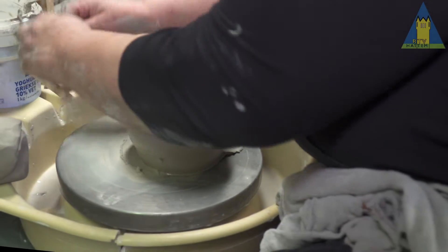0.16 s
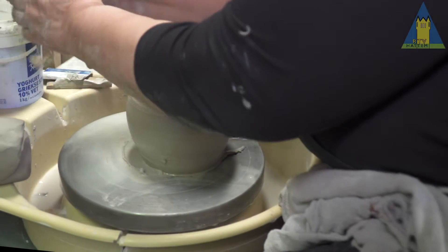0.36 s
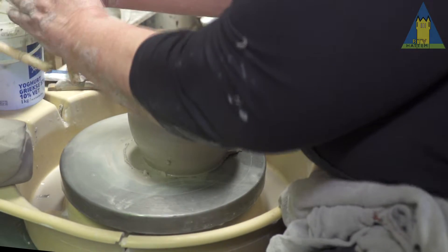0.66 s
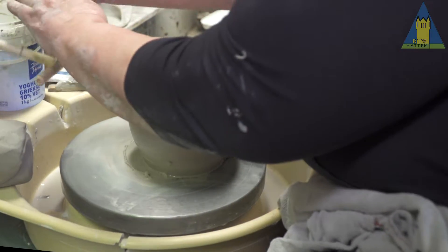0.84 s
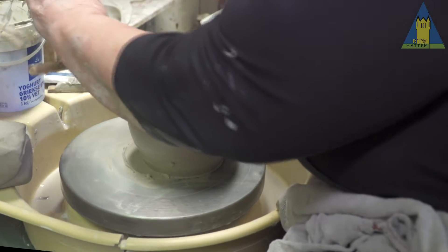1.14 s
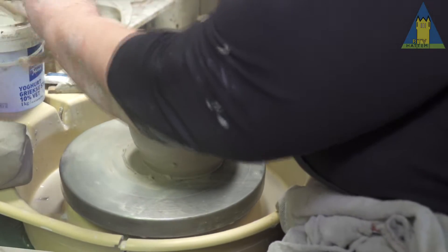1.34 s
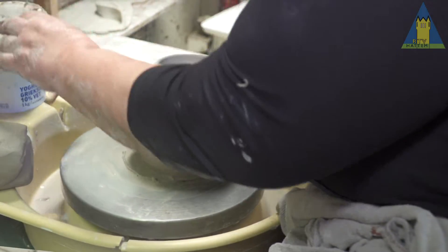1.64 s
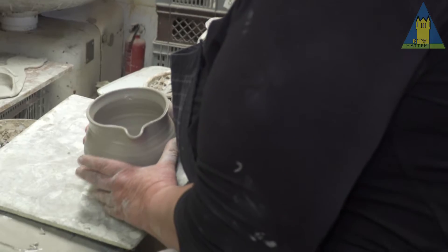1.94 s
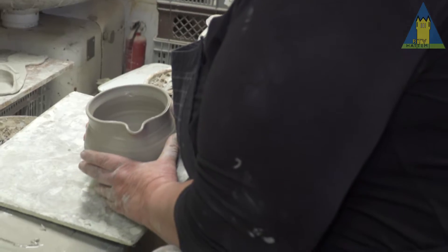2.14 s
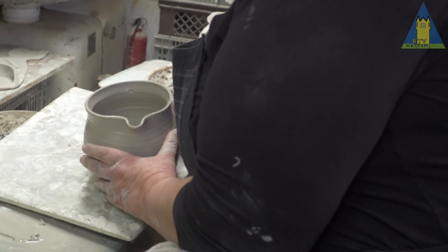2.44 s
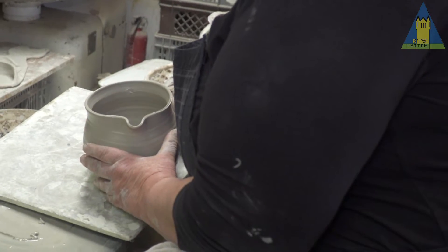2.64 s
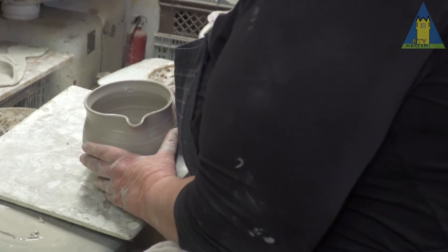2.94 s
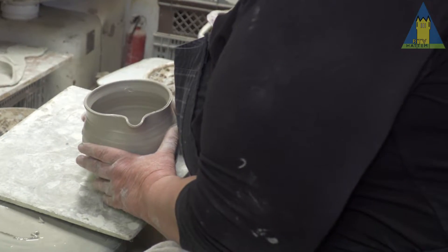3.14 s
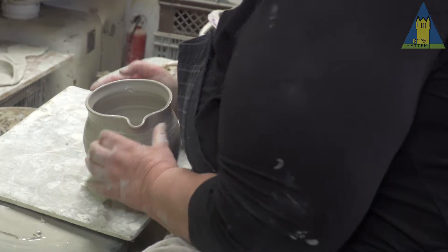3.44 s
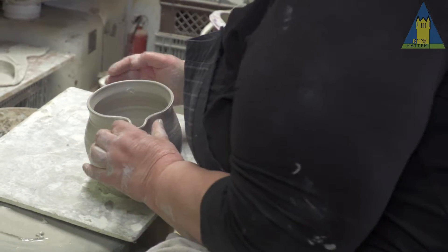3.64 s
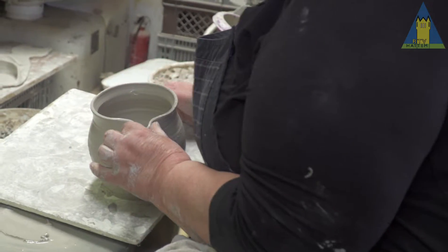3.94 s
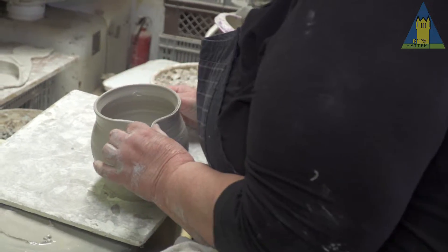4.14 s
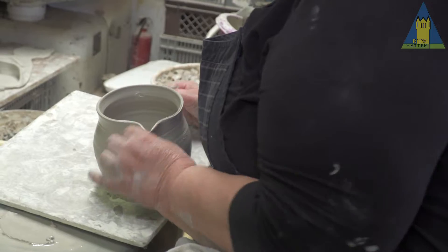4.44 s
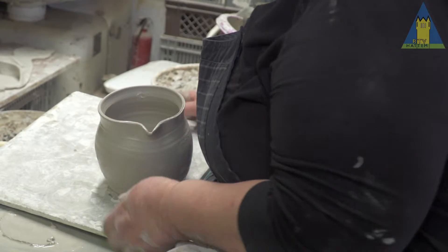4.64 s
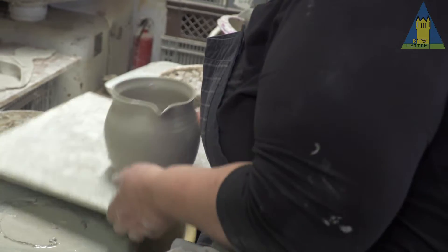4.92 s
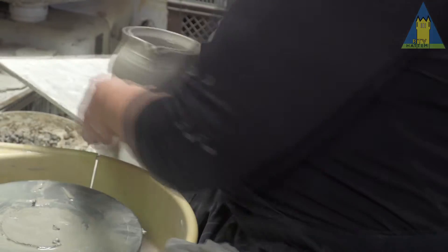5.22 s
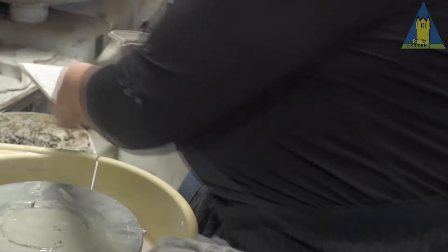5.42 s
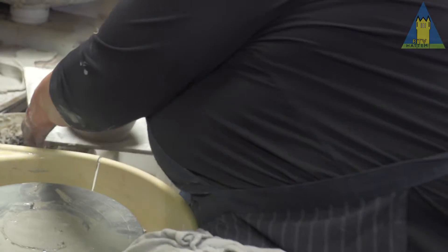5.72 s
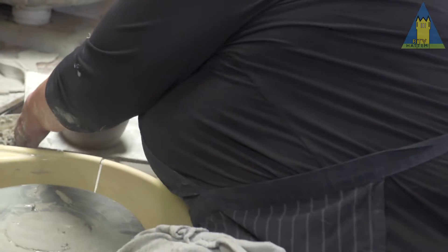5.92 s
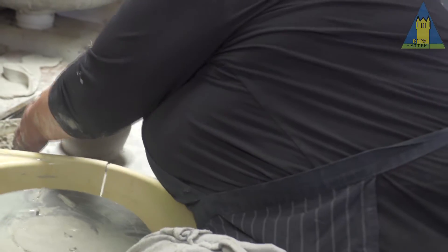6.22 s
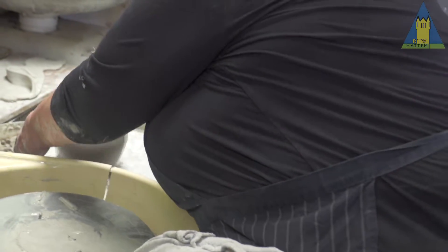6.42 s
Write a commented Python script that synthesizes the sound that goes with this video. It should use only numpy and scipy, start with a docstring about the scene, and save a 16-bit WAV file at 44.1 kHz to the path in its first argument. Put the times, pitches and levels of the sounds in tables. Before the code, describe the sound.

Close stereo sound in a small studio with short reflections. An electric potter's wheel runs throughout: low rumble, motor hum, a steady nasal whine around 600 Hz throbbing rapidly about 25 times a second, airy bearing hiss and very faint thin treble. At 0.04 s a tool clacks sharply over a brief dying ring, followed by gritty crunches near 0.13 s. Light dry stick taps come at 0.8-0.87 s. The drive sinks quieter and duller around 1.0-1.4 s, with soft low plastic pan bumps at 1.26-1.29 and 1.44-1.47 s. It rises again by 2 s, fuller and wavering, with a higher whine surfacing near 3.15 s. A tiny grit tick falls at 2.3 s, a soft scuff around 4.6 s, and a click with a crunch near 5.1 s. Small bright clicks follow until 6.06 s; at 6.52 s the board lands with a loud, sharp, hollow knock, quickly decaying over the motor.

```python
"""An electric potter's wheel hums and whines in a small studio, throbbing about once a turn over bearing rush.
A tool clacks and a stick taps; then the whole drive sinks quieter and duller, the splash pan bumps dully,
and the drive comes back. Later a board with a jug clicks in the grip and is set down with a sharp knock.
The drive is sine tones at shaft orders plus shaped noise that follows level curves; each object is
a filtered click ringing resonant modes; grit is short noise bursts throughout."""
import sys
import numpy as np
from scipy import signal
from scipy.fft import rfft, irfft, next_fast_len
from scipy.io import wavfile

SR = 44100
rng = np.random.default_rng(int(sys.argv[2]) if len(sys.argv) > 2 else 0)


def store_pcm(level_fs):
    """Save levels as 16-bit WAV."""
    pcm = np.round(np.clip(level_fs, -1, 1) * 32767).astype(np.int16)
    wavfile.write(sys.argv[1], SR, np.atleast_2d(pcm).T)


N = 289591
T_S = np.arange(N) / SR
HZ = np.maximum(np.arange(N // 2 + 1) * SR / N, 1)
SHAFT_HZ = 25

# wheel loudness, used as swing about the median: (time [s], hiss level [dB], casing level [dB])
WHEEL = [(0.17, -63, -54.5), (1.2, -72.5, -68.5), (1.41, -72, -64.5), (1.97, -60, -55.5),
         (2.44, -58, -51.5), (3.04, -58, -50), (4.51, -57.5, -52.5), (5.7, -56.5, -50.5),
         (6.45, -59.5, -51)]
# whine: (time [s], level [dB], depth of the throb [0-1])
WHINE = [(0.0, -47.8, 0.3), (1.0, -56.5, 0.12), (1.3, -62.5, 0.6), (1.6, -51.5, 1), (2.0, -50, 1),
         (2.35, -43, 0.34), (2.9, -51, 0.7), (3.25, -45, 0.53), (3.6, -49, 0.47), (4.05, -44, 0.6),
         (5.5, -43.5, 0.42), (5.9, -40.5, 0.33), (6.5, -42, 0.3)]


def from_db(db):
    """Decibels to amplitude gain."""
    return 10 ** (np.asarray(db) / 20)


def rms_one(x):
    """Scale to unit power."""
    return x / np.sqrt(np.mean(x ** 2) + 1e-20)


def in_time(rows):
    """Interpolate each column of a level curve to every sample."""
    time_s, *columns = np.transpose(rows)
    return [np.interp(T_S, time_s, c) for c in columns]


def at_hz(points, hz, outside=None):
    """Read a spectrum in dB on a log-frequency axis."""
    f, db = np.transpose(points)
    return np.interp(np.log(hz), np.log(f), db, left=outside, right=outside)


def drift(rate, size=N, per_unit=SR):
    """Random curve of unit power, with `rate` random points per unit joined by lines."""
    at = np.arange(size) / per_unit * rate
    return rms_one(np.interp(at, np.arange(4096), rng.standard_normal(4096)))


def noise(spectrum):
    """Gaussian noise of the given density in dB per Hz."""
    shaped = rfft(rng.standard_normal(N)) * from_db(at_hz(spectrum, HZ, -np.inf))
    return irfft(shaped, N) * np.sqrt(SR / 2)


def swell(db):
    """Gain of a level curve relative to its median."""
    return from_db(db - np.median(db))


def rippled(x, depth_db):
    """Many small resonances of the housing ripple a spectrum, with a random point every 45 Hz."""
    ripple = drift(1 / 45, size=len(HZ), per_unit=N / SR)
    return irfft(rfft(x) * from_db(depth_db * ripple), N)


def shaft_order(order):
    """A sine of unit power at a multiple of the shaft rate, its start phase random over a full turn."""
    return np.sqrt(2) * np.sin(2 * np.pi * order * SHAFT_HZ * T_S + 2 * np.pi * rng.random())


def motor():
    """Shaft tones, whine and drone over the noise of drive and bearings."""
    # noise densities at median level, all (frequency [Hz], density [dB per Hz])
    rumble_density = [(10, -69), (25, -81.5), (37, -70), (50, -77.5), (70, -88.5), (120, -100)]
    rush_density = [(60, -107), (120, -87.5), (170, -90.5), (280, -84), (430, -80.5), (500, -91),
                    (590, -68), (700, -79.5), (850, -88), (1200, -94), (1600, -104)]
    casing_density = [(1000, -104), (1290, -94), (1370, -83.5), (1650, -89), (1830, -80.5), (1960, -96),
                      (2200, -89), (2700, -102.5), (3400, -102)]
    hiss_density = [(1800, -104), (2800, -92.5), (3400, -100.5), (3900, -94.5), (5000, -95.5), (6200, -99),
                    (7000, -101), (8200, -99), (8700, -104), (10500, -109), (15500, -115)]
    hiss_gain, casing_gain = map(swell, in_time(WHEEL))
    whine_gain = swell(in_time(WHINE)[0])
    # exponents are shares of the dB swing
    rush_gain = hiss_gain ** 0.54 * whine_gain ** 0.2
    rumble_gain = hiss_gain ** 0.8
    drone_gain = hiss_gain ** 2

    tones = shaft_tones(rush_gain, casing_gain, waver=.5, waver_hz=2.4, split_hz=840)
    bed = rumble_gain * noise(rumble_density)
    bed += rush_gain * rippled(noise(rush_density), depth_db=1.0)
    bed += casing_gain * rippled(noise(casing_density), depth_db=2.2)
    bed += hiss_gain * (rippled(noise(hiss_density), depth_db=0.73) + bearings(waver_per_s=14))
    song = whine(flutter_db=.7, wander_rad=.25, sway_rad=.34)
    return tones + song + drone(drone_gain) + bed


def whine(flutter_db, wander_rad, sway_rad):
    """Rotor slots sing at the 24th order; the off-centre rotor makes it throb about once a turn."""
    # resonance driven by the whine: (frequency [Hz], density [dB per Hz relative to the whine])
    resonance = [(470, -52), (540, -43), (600, -32), (650, -40), (720, -52)]
    # higher whine at the 73rd order: (time [s], level [dB])
    upper_level = [(0.17, -64.5), (1.39, -78), (1.88, -62), (3.15, -50), (3.23, -61), (3.55, -55.5),
                   (4.05, -60), (5.83, -51.5), (6.42, -58)]
    first_throb_s, throb_slip_hz = .009, .08
    beat_hz, beat_db = 10.2, -10

    level_db, depth = in_time(WHINE)
    turn = 2 * np.pi * SHAFT_HZ * T_S
    # speed sway within each turn puts side lines around the whine
    uneven = sway_rad * (np.sin(2 * turn) + .5 * np.cos(3 * turn))
    wander = wander_rad * drift(12.0)
    slots = np.sqrt(2) * np.sin(24 * turn + uneven + wander)
    # the throb slowly slips behind the shaft
    throb_hz = SHAFT_HZ - throb_slip_hz
    throb = 1 + depth * np.cos(2 * np.pi * throb_hz * (T_S - first_throb_s))
    # a second tone just under the whine beats with it
    beat_phase = 24 * turn - 2 * np.pi * beat_hz * T_S + drift(2)
    beating = np.sqrt(2) * from_db(beat_db) * np.sin(beat_phase)
    upper_gain = from_db(in_time(upper_level)[0] + 2 * flutter_db * drift(5))
    upper = np.sqrt(2) * upper_gain * np.sin(73 * turn + 2 * wander)
    gain = from_db(level_db + flutter_db * drift(12))
    return gain * (throb * (slots + noise(resonance)) + beating) + upper


def shaft_tones(low_gain, high_gain, waver, waver_hz, split_hz):
    """Shaft orders 5 to 199 sound, each wavering with the load, more so at high frequency."""
    # strong orders at median level: (frequency [Hz], level [dB])
    strong_orders = [(200, -66), (300, -55), (350, -78.5), (400, -68), (450, -63), (475, -66.5),
                     (500, -62.5), (700, -72), (725, -79), (750, -70.5), (825, -63.5), (850, -65.5),
                     (925, -66), (1350, -62), (1375, -61), (1425, -86), (1450, -62), (1475, -72),
                     (1575, -64), (1700, -73.5), (1800, -69), (1875, -66)]
    # level of each weak order between them: (frequency [Hz], level [dB])
    weak_orders = [(125, -84), (150, -71.5), (200, -84), (420, -89.5), (800, -70), (1200, -78),
                   (1550, -78.5), (2200, -76.5), (3000, -84), (4000, -85.5), (5000, -92)]
    strong = {round(hz / SHAFT_HZ): db for hz, db in strong_orders}
    orders = np.arange(5, 200)
    level = from_db([strong.get(k, at_hz(weak_orders, k * SHAFT_HZ)) for k in orders])
    size = 8 * SR
    hz = np.arange(size // 2 + 1) * SR / size
    lines = np.zeros(len(hz), complex)
    phase = 2 * np.pi * rng.random(len(orders))
    lines[orders * SHAFT_HZ * size // SR] = level * np.exp(1j * phase)
    # wavering spreads part of each line into a narrow skirt
    offset_hz = np.linspace(-SHAFT_HZ / 2, SHAFT_HZ / 2, num=201)
    skirt = 1 / (1 + (offset_hz / waver_hz) ** 2) ** 2
    spread = np.sqrt(np.convolve(abs(lines) ** 2, skirt / skirt.sum() / 2, "same"))
    share = np.minimum(waver * np.sqrt(hz / 1000), .95)
    chance = [1, 1j] @ rng.standard_normal((2, len(hz)))
    lines = np.sqrt(1 - share ** 2) * lines + share * spread * chance
    low = irfft(lines * (hz < split_hz))[:N] * size / np.sqrt(2)
    high = irfft(lines * (hz >= split_hz))[:N] * size / np.sqrt(2)
    return low * low_gain + high * high_gain


def drone(gain):
    """Magnetic hum at twice the mains rate and a few low orders that swell and fade at random."""
    # (time [s], level [dB])
    hum_level = [(0.1, -66.5), (1.24, -75.5), (1.87, -74), (2.27, -61.5), (3.19, -57.5), (3.4, -74.5),
                 (4.13, -62), (6.4, -66)]
    # frame orders at median wheel level: (frequency [Hz], level [dB])
    frame_orders = [(250, -64), (325, -59.5), (550, -59.5)]
    fade_db, fades_per_s = 0.5, 2.548
    hum = from_db(in_time(hum_level)[0]) * shaft_order(order=4)
    frame = 0
    for hz, db in frame_orders:
        frame = frame + from_db(db + fade_db * drift(fades_per_s)) * shaft_order(round(hz / SHAFT_HZ))
    return hum + gain * frame


def bearings(waver_per_s):
    """Narrow rings that swell and fade as the balls roll."""
    # (frequency [Hz], level [dB])
    rings = [(2067, -69.5), (2148, -67.5), (2326, -70), (2902, -72.5), (3779, -72.5), (3892, -85),
             (4011, -71), (4339, -83), (4683, -72.5), (4963, -74), (6358, -84)]
    out = 0
    for hz, db in rings:
        phase = 2 * np.pi * hz * T_S
        ring = drift(waver_per_s) * np.sin(phase) + drift(waver_per_s) * np.cos(phase)
        out = out + from_db(db) * ring
    return out


def whistles():
    """Thin electrical treble tones that follow half the dB swing of the hiss."""
    # level before the channel gains: (frequency [Hz], level [dB])
    tones = [(12938, -83), (14375, -83), (14425, -84)]
    total = sum(from_db(db) * np.sin(2 * np.pi * hz * T_S) for hz, db in tones)
    return np.sqrt(2) * total * np.sqrt(swell(in_time(WHEEL)[0]))


def strike(contacts, modes, crowd, crowd_t60_s, low_hz):
    """Each contact is a low-passed click that sets strong modes and a crowd of weak ones ringing."""
    force = np.full(N, 1e-18)
    for s, db, cut_hz in contacts:
        dulling = signal.butter(2, cut_hz, fs=SR, output="sos")
        pulse = signal.sosfilt(dulling, np.eye(1, 256)[0])
        at = round(s * SR)
        force[at:at + len(pulse)] += from_db(db) * pulse[:N - at]
    out = signal.fftconvolve(force, crowd_ring(crowd, crowd_t60_s))[:N]
    for k, (hz, db, t60_s) in enumerate(modes):
        r, w = from_db(-60 / (t60_s * SR)), 2 * np.pi * hz / SR
        ring = signal.lfilter([0, np.sin(w)], [1, -2 * r * np.cos(w), r * r], force)
        out -= (-1) ** k * from_db(db) * ring
    # a small body radiates little bass
    return signal.sosfilt(signal.butter(2, low_hz, "high", fs=SR, output="sos"), out)


def crowd_ring(crowd, t60_s):
    """Modes too many to tell apart: half-octave noise bursts whose treble dies first."""
    t, out = T_S[:SR // 3], 0
    for hz in 125 * 2 ** (np.arange(14) / 2):
        band = signal.butter(2, [hz / 2 ** .25, hz * 2 ** .25], "band", fs=SR, output="sos")
        band_t60_s = t60_s * np.sqrt(1000 / hz)
        burst = rng.standard_normal(len(t)) * from_db(-60 * t / band_t60_s)
        gain = from_db(at_hz(crowd, hz, -np.inf)) * np.sqrt(SR / hz)
        out = out + gain * signal.sosfilt(band, burst)
    return out


# In the five sources below, levels are relative drives. Columns:
# contacts (time [s], level [dB], cut-off [Hz]); modes (frequency [Hz], level [dB], t60 [s]);
# crowd of weaker modes (frequency [Hz], level [dB])


def board_knock():
    """The board is set down, landing on one edge then the other; a quick echo follows and its modes ring."""
    # contacts, modes and crowd, columns as above
    contacts = [(6.519, -13, 5000), (6.5243, -21.5, 1770), (6.5345, -20, 1200)]
    modes = [(245.4, -5, 0.1), (360, -2, .07), (434, 0, 0.075), (490, -14, 0.044), (635, 5, 0.12),
             (818, 0.5, 0.051), (890, -2.5, 0.063), (1270, -8, 0.053), (1470, -4, 0.059), (1760, 4, 0.024),
             (2360, -16, 0.029), (2740, -17, 0.062), (3040, -26, 0.095), (3440, -10, 0.022),
             (4160, -25, 0.054)]
    crowd = [(180, -23), (500, -12), (900, -8), (1700, -9), (3300, -11.5), (4500, -33.5), (6000, -35),
             (9000, -43)]
    return strike(contacts, modes, crowd, crowd_t60_s=0.17, low_hz=168)


def grip_clicks():
    """The board clicks in the grip as it is carried, ringing sharp modes."""
    # contacts, modes and crowd, columns as above
    contacts = [(5.076, -45, 13000), (5.2352, -54, 9000), (5.484, -52, 9000), (5.597, -56, 9000),
                (5.7805, -46.5, 8000), (5.788, -52, 5000), (5.8415, -45.5, 8360), (5.849, -61, 6000),
                (6.0615, -40.5, 8160), (6.068, -54, 5000)]
    modes = [(1530, -15, 0.12), (2430, -1, 0.063), (3000, -3, 0.12), (3920, -10, 0.075), (4670, -21, .1),
             (6470, -2.5, .1), (7800, -8, 0.1), (9970, -10, .13)]
    crowd = [(170, -30), (400, -3), (1000, -3), (2000, 2.5), (4000, -5), (7000, -6), (14000, -5)]
    return strike(contacts, modes, crowd, crowd_t60_s=0.13, low_hz=140)


def tool_clacks():
    """A dropped tool rings its own modes."""
    # contacts, modes and crowd, columns as above
    contacts = [(.0428, -24, 7000), (.0468, -30, 3450), (.059, -33, 1200)]
    modes = [(399, -6, 0.087), (515, -11, 0.14), (615, -5, .1), (930, -7, 0.032), (1110, -1.5, 0.038),
             (1264, -20, 0.036), (1506, 0, 0.03), (1840, 0.5, 0.05), (2050, -14, 0.044), (2820, 1, 0.026),
             (3290, -18, 0.036), (3840, -4, 0.026), (4680, -8, 0.014), (5450, -16, 0.012)]
    crowd = [(250, -24), (500, -6), (1000, -8), (1800, -5.5), (3000, -3.5), (5000, -12), (7000, -18),
             (12000, -14)]
    return strike(contacts, modes, crowd, crowd_t60_s=0.047, low_hz=252)


def pan_bumps():
    """Soft contacts excite the low modes of the plastic splash pan."""
    # contacts, modes and crowd, columns as above
    contacts = [(1.2615, -43, 1400), (1.292, -38.5, 1150), (1.4425, -31.5, 1030), (1.466, -34, 590)]
    modes = [(117.4, -21.5, 2.1), (283, -9, 0.049), (377, 1, 0.087), (426, -3, 0.1), (607, -6, 0.12),
             (780, -1.5, 0.038), (1083, -9, 0.1), (1410, -25, 0.062), (1900, -12, 0.052), (3070, -13, .04)]
    crowd = [(150, -21.5), (350, -12.5), (600, -11), (1100, -14), (2000, -18), (4000, -10)]
    return strike(contacts, modes, crowd, crowd_t60_s=0.13, low_hz=121)


def stick_taps():
    """Light taps ring the short treble modes of a stick."""
    # contacts, modes and crowd, columns as above
    contacts = [(.796, -39, 8000), (.8403, -46, 8000), (.8715, -52.5, 9000)]
    modes = [(1810, -2, 0.023), (2850, -12, .025), (4080, -5, 0.023), (5000, 0, 0.022), (6450, -11, .02)]
    crowd = [(900, -23), (1800, -7), (3000, -6), (5000, 3), (7000, -27), (12000, -24)]
    return strike(contacts, modes, crowd, crowd_t60_s=0.041, low_hz=900)


def scuffs(grain_db):
    """Dried clay grit crunches in short noise bursts as hands and board slide."""
    # (peak time [s], level [dB], rise [s], decay [s])
    slides = [(0.131, -39, 0.0021, 0.0066), (.15, -49.5, .004, 0.0072), (.475, -58.5, .002, 0.0093),
              (2.322, -51, .001, .005), (4.62, -49.5, 0.13, 0.13), (5.095, -41.5, 0.017, 0.012),
              (6.088, -63, .006, .02)]
    # relative colour: (frequency [Hz], level [dB])
    grit_colour = [(300, -20), (900, -4), (1600, 0), (2500, -1), (4000, -4), (6300, -6), (7600, -7),
                   (9000, -14), (10200, -12), (15000, -24)]
    push = np.zeros(N)
    for s, db, rise_s, decay_s in slides:
        push += from_db(db) * np.exp(-np.maximum((s - T_S) / rise_s, (T_S - s) / decay_s))
    return push * rms_one(noise(grit_colour) * from_db(grain_db * drift(500)))


def ringing():
    """Something struck just before the start still rings: a few modes dying away."""
    # (frequency [Hz], level at the start [dB], t60 [s])
    modes = [(903, -38, 0.17), (1675, -39, 0.18), (3300, -52, 0.19)]
    return sum(from_db(db - 60 * T_S / t60_s) * np.sin(2 * np.pi * hz * T_S) for hz, db, t60_s in modes)


def studio(x, wet_db):
    """Dense reflections from benches and walls: a decaying noise tail after 3 ms."""
    room_t60_s = 0.29
    t = T_S[:SR // 2]
    tail = rng.standard_normal(len(t)) * from_db(-60 * t / room_t60_s) * (t > .003)
    return x + from_db(wet_db) * signal.fftconvolve(x, tail / np.linalg.norm(tail))[:N]


def microphones(x):
    """Two close capsules share the sound; each has its own colour and a hiss that follows the wheel."""
    # hiss density at median wheel level: (frequency [Hz], density [dB per Hz])
    own_density = [(2000, -112), (5000, -104), (8000, -103), (11000, -108), (15500, -110)]
    # (frequency [Hz], left minus right [dB])
    balance = [(100, 2.5), (1000, 2.5), (4000, 2.5), (8000, 0), (13000, -6.5)]
    own_hiss = swell(in_time(WHEEL)[0]) * np.array([noise(own_density), noise(own_density)])
    size = next_fast_len(N + SR // 10)
    hz = np.maximum(np.arange(size // 2 + 1) * SR / size, 1)
    colour = from_db(np.outer([1, -1], at_hz(balance, hz)) / 2)
    return irfft(rfft(x + own_hiss, size) * colour, size)[:, :N]


def scene():
    """The wheel, and the handling around it."""
    handling = board_knock() + grip_clicks() + tool_clacks() + pan_bumps() + stick_taps()
    handling = studio(handling + scuffs(grain_db=2.5), wet_db=-10)
    # left and right whistle gains in dB
    whistle_pair = whistles() * from_db([[-5], [3.5]])
    return microphones(motor() + handling + ringing()) + whistle_pair


def record(dry):
    """Clip peaks just under full scale, then cut the top with a steep low-pass."""
    cutoff_hz = 15750
    low_pass = signal.ellip(10, .1, 90, cutoff_hz, fs=SR, output="sos")
    return signal.sosfilt(low_pass, np.clip(dry, -.95, .95))


dry = scene()
out = record(dry)
store_pcm(out)
```